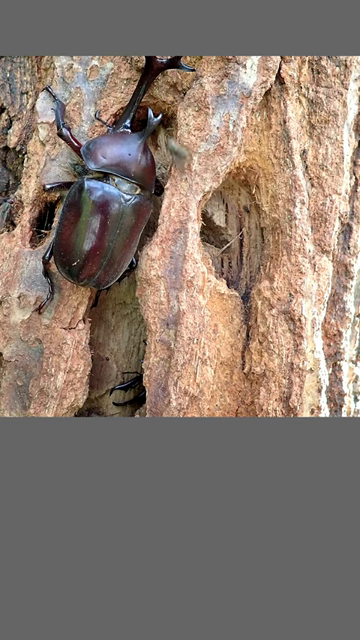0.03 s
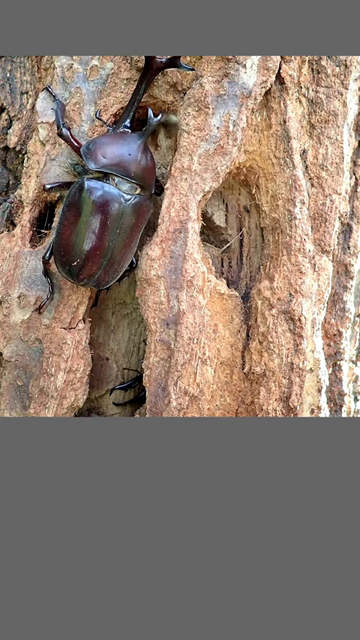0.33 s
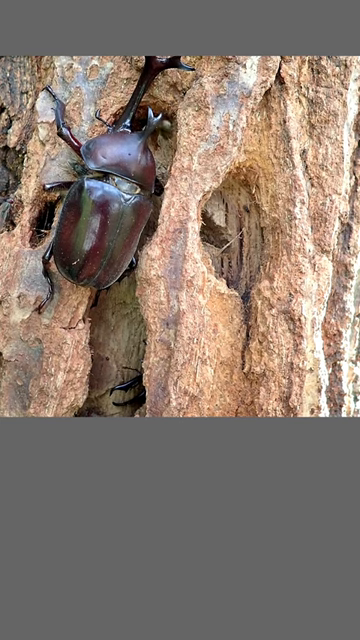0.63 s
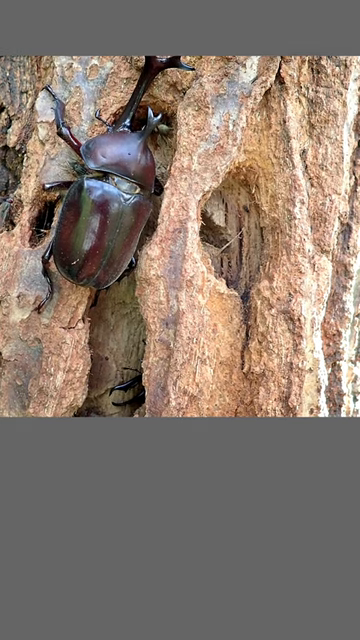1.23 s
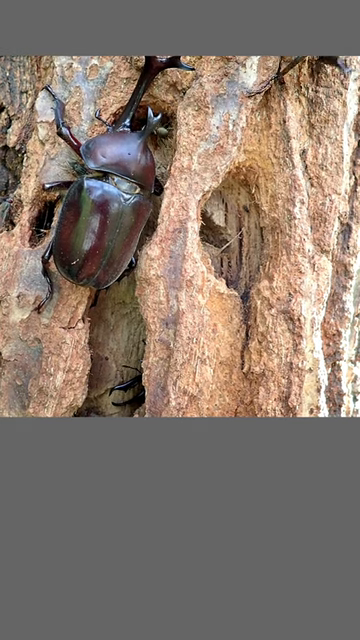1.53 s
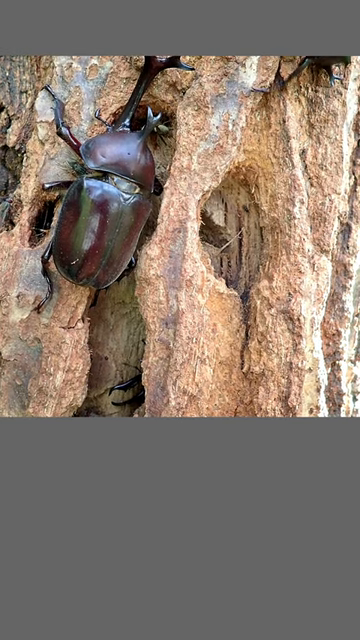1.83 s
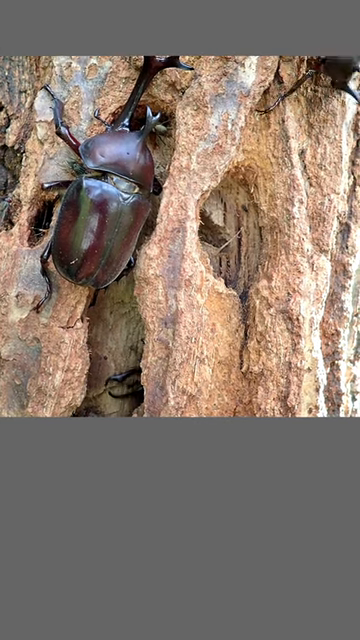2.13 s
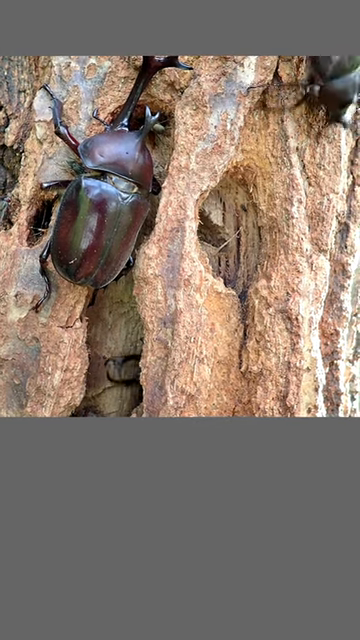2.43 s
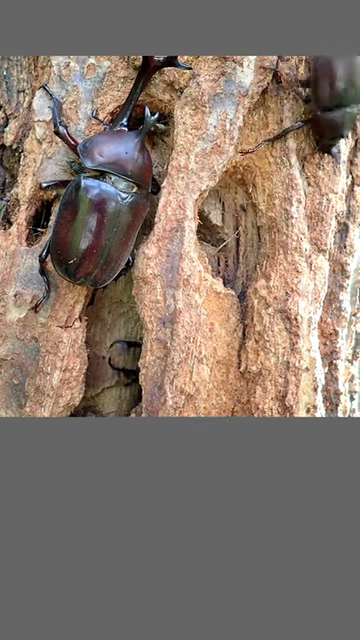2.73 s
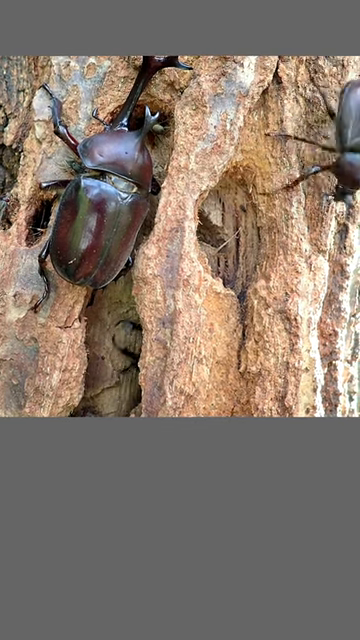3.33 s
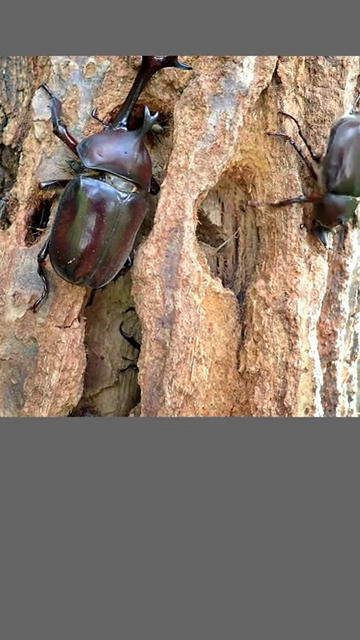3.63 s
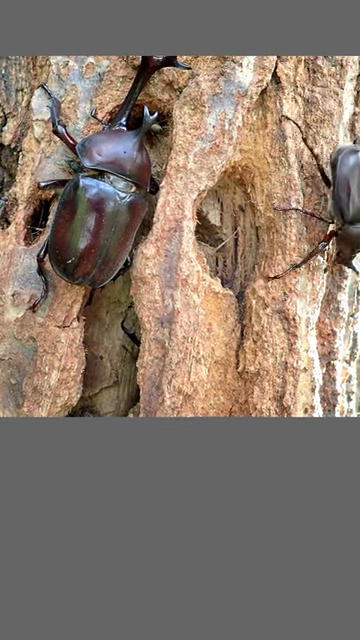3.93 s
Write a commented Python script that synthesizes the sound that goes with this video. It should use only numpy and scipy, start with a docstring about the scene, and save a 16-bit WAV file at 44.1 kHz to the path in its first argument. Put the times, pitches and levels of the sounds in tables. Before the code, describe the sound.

A nearby cicada chirps in quick buzzing phrases over a hissing chorus of distant cicadas.

```python
"""Cicadas in a summer wood. A far chorus sizzles from the start, over faint outdoor rumble and a low hum.
Almost at once a near cicada snaps its tymbals in quick chirps, each click ringing its body; its phrases
end in a brighter buzz. A few dull pops sit under the clicks, and a limiter holds the loudest peaks level.
Just past halfway a distant insect joins with a thin pulsing whistle; near the end the hum swells."""
import sys
import numpy as np
from scipy import signal
from scipy.fft import rfft, irfft, next_fast_len
from scipy.io import wavfile
from scipy.ndimage import uniform_filter1d, minimum_filter1d, map_coordinates

SR = 44100
rng = np.random.default_rng(int(sys.argv[2]) if len(sys.argv) > 2 else 0)


def persist_wave(psi):
    """Save psi, clipped to +-1, as 16-bit WAV."""
    counts = np.round(np.clip(psi, -1, 1) * 32767).astype(np.int16)
    wavfile.write(sys.argv[1], SR, np.atleast_2d(counts).T)


N = 176400

# colour of the far chorus (frequency [Hz], relative level [dB])
CHORUS_SPECTRUM = [(1500, -60), (2200, -33), (2850, -23), (3450, -29), (3900, -16.5), (4400, -5),
                   (5400, -.5), (6500, -.5), (7400, -3), (8400, -7), (9200, -21), (10000, -29),
                   (11400, -15.5), (12800, -13.5), (14400, -9), (15800, -18)]
# its stereo image (frequency [Hz], left-right likeness [-1 to 1])
CHORUS_IMAGE = [(2000, .85), (3500, .6), (5500, .45), (9000, 0), (13000, -.4)]
CHORUS_DB, CHORUS_FLUTTER_DB, TICKS_PER_S, TICKS_DB = -23, 1.0, 500, -33
# hiss of the chorus's highest voices (frequency [Hz], relative level [dB])
SIZZLE_SPECTRUM = [(6000, -40), (7200, -8), (7800, -1), (8300, 0), (8700, -4), (9200, -22), (10500, -50)]
# thin tones in that hiss (pitch [Hz], relative level [dB])
THIN_TONES = [(7776, -9), (8157, -10), (8247, -8), (8642, -14), (8748, -16), (14364, -20), (14710, -18)]
TONE_WAVER_HZ, TONE_FLUTTER_DB = 22, 3.5
# fader ride on hiss and tones together (time [s], gain [dB])
SIZZLE_FADER = [(0, -39), (.4, -37), (.85, -31), (1.3, -30), (1.7, -32), (2.3, -30), (4, -29.5)]

# colour of the outdoor rumble (frequency [Hz], relative level [dB])
RUMBLE_SPECTRUM = [(20, -19), (45, -10), (65, -3), (140, 0), (330, 1), (500, -3), (1000, -7), (1600, -10),
                   (2000, -7), (3000, -14), (6000, -30)]
# its stereo image (frequency [Hz], left-right likeness [-1 to 1])
RUMBLE_IMAGE = [(50, .25), (150, .42), (400, .58), (1000, .55), (2000, .75)]
# fader ride on the hum (time [s], gain [dB])
HUM_FADER = [(0, -67), (3.5, -66), (3.8, -56), (4, -55)]
RUMBLE_DB, HUM_HZ = -48.8, 295
# the background leans left (frequency [Hz], left minus right [dB])
BACKGROUND_PAN = [(60, 2), (200, .3), (500, 1.5), (1200, 1.8), (2400, 0), (4400, 2.5), (8000, 2),
                  (15000, 1.5)]

# the near cicada's chirps (start [s], clicks [count])
CHIRP_CUES = [(.0486, 4), (.1094, 4), (.1663, 5), (.2242, 5), (.4139, 4), (.4686, 5), (.5279, 4),
              (.5853, 5), (.6469, 4), (.7052, 4), (.7639, 4), (.8212, 4), (.8808, 4), (1.0613, 4),
              (1.1137, 5), (1.1751, 4), (1.2288, 5), (1.2907, 4), (1.348, 4), (1.4045, 5), (1.4654, 4),
              (1.5244, 4), (1.7102, 4), (1.7669, 3), (1.8224, 3), (1.8759, 4), (1.9344, 4), (1.9945, 4),
              (2.0482, 5), (2.1888, 3), (2.2442, 4), (2.3017, 3), (2.3526, 4), (2.4101, 3), (2.4624, 4),
              (2.518, 4), (2.7034, 4), (2.7599, 4), (2.8154, 4), (2.8703, 4), (2.9266, 4), (2.9837, 4),
              (3.0353, 4), (3.2191, 3), (3.2765, 3), (3.3288, 3), (3.3832, 3), (3.4328, 4), (3.491, 3),
              (3.5424, 3), (3.7256, 4), (3.7841, 3), (3.8393, 3), (3.8942, 3), (3.9475, 4)]
# spacing of the clicks in a chirp (gap [s])
CLICK_GAPS = [.004, .0035, .0038, .0042]
# buzzes that end its phrases (start [s], clicks [count])
BUZZ_CUES = [(.2798, 23), (.9302, 22), (1.5753, 22), (2.078, 15), (2.5711, 20), (3.0793, 22), (3.587, 22)]
BUZZ_LAST_GAP_S, BUZZ_SHRINK_S, JITTER_S = .0029, .000043, .00012  # a buzz speeds up click by click
# the body's low ring (base pitch [Hz], gain [dB], rise [s], fall [s], octave overtone [dB])
LOW_BODY_RING = (5860, 1.2, .00018, .00042, -22)
# its high ring in a buzz (base pitch [Hz], gain [dB], rise [s], fall [s], octave overtone [dB])
HIGH_BODY_RING = (7080, -1.8, .0003, .00065, -15)
HIGH_PEAK_CLICKS, HIGH_SPREAD_CLICKS = 4.5, 5  # the high ring peaks this far before a buzz ends
LOW_DUCK, HIGH_SAG_HZ = .52, 750  # the low ring ducks under it; the high one is flatter when weak
CLICK_SCATTER_DB, PITCH_SCATTER, PITCH_SAG_PER_S = .8, .02, .009  # pitch changes are shares of the base
# the body radiates little below 5 kHz (frequency [Hz], gain [dB])
BODY_EQ = [(3500, -16), (4500, -11), (4850, -6), (5150, 3), (5400, 1), (5720, -2), (6000, .5), (6300, 0),
           (6700, 1.5), (7200, 0)]
# colour of the bright noise on each click (frequency [Hz], relative level [dB])
CLICK_NOISE_SPECTRUM = [(200, -19), (1000, -20), (1700, -22), (2200, -11.5), (2800, -3), (3500, -11),
                        (4600, -9), (5200, 1), (6500, 3), (7200, 3), (8300, 2), (9600, -21), (11400, 7.5),
                        (12600, 10.5), (13400, 5), (16000, -6)]
CLICK_NOISE_DB, CLICK_NOISE_S = -18, .00035
# early reflections off bark, a list for each ear, left first (delay [s], gain [dB])
BARK_ECHOES = [
    [(.0014, -14), (.0019, -17)],
    [(.0008, -10), (.0013, -14)],
]
RIGHT_DB, RIGHT_LEAD_S, WOOD_T60_S, NEAR_WET_DB = -4.0, .000035, .25, -17
# soft pops under the clicks (time [s], level [dB])
POP_CUES = [(.337, -38), (.343, -37), (.532, -39), (1.632, -39), (2.112, -38), (2.625, -39)]
POP_WIDTH_S, POP_CUTOFF_HZ = .0015, 1500

# the distant insect's notes (start [s], nominal length [s], relative level [dB])
WHISTLE_NOTES = [(2.39, .05, -55), (2.49, .06, -54), (2.59, .05, -55), (2.694, 0.036, -51),
                 (2.776, 0.066, -50), (2.883, 0.06, -48), (2.981, 0.058, -45), (3.079, 0.056, -48),
                 (3.183, 0.06, -47), (3.275, 0.076, -46), (3.384, 0.05, -48), (3.476, 0.058, -49),
                 (3.582, 0.062, -50), (3.698, 0.058, -47), (3.811, 0.05, -47), (3.919, 0.048, -48)]
# its centre pitch (time [s], pitch [Hz])
WHISTLE_PITCH = [(2.4, 2055), (2.6, 2070), (2.8, 2120), (3.1, 2128), (3.45, 2112), (4, 2102)]
# its octave overtone (time [s], level over the fundamental [dB])
WHISTLE_OCTAVE = [(2.4, 10), (3.0, 8.5), (3.3, 9.5), (3.43, 15), (3.55, 14), (3.7, 11), (4, 11.5)]
WHISTLE_WAVER_HZ, WHISTLE_ARCH_HZ, OCTAVE_LAG_S = 10, 14, .018
WHISTLE_GAIN_DB, WHISTLE_WET_DB = 4.5, -10

START_S, LIMIT, LIMITER_S, HIGH_CUT_HZ = .035, .98, .0008, 15800


def amp(db):
    """Decibels to gain."""
    return 10 ** (np.asarray(db) / 20)


def unit(x):
    """Scale to rms 1."""
    return x / np.sqrt(np.mean(x ** 2) + 1e-20)


def along(points, hz):
    """Read (Hz, value) points on a log frequency axis."""
    f, v = np.transpose(points)
    return np.interp(np.log(hz + 1), np.log(f + 1), v)


def ride(points):
    """An automation curve through (time, value) points."""
    return np.interp(np.arange(N) / SR, *np.transpose(points))


def wobble(rate):
    """A smooth random curve, rate knots a second."""
    return map_coordinates(rng.standard_normal(int(N * rate / SR) + 4), [np.arange(N) * rate / SR])


def filtered(x, response):
    """Pass x through a complex frequency response."""
    size = next_fast_len(N + SR // 2)
    return irfft(rfft(x, size) * response(np.fft.rfftfreq(size, 1 / SR)), size)[..., :N]


def noise_bed(spectrum, image):
    """Coloured stereo noise of rms 1, its width set band by band."""
    def mid_side(hz):
        width = np.arccos(np.clip(along(image, hz), -1, 1)) / 2
        return amp(along(spectrum, hz)) * [np.cos(width), np.sin(width)]
    mid, side = filtered(rng.standard_normal((2, N)), mid_side)
    return unit(np.array([mid + side, mid - side]))


def rings(times, gains, pitches, rise_s, fall_s, overtone_db, size=256):
    """One short swelling and dying tone with its octave per click."""
    index = (times * SR).astype(int)[:, None] + np.arange(size) - size // 4
    t = index / SR - times[:, None]
    envelope = np.exp(-.5 * (t / np.where(t < 0, rise_s, fall_s)) ** 2)
    phase = 2 * np.pi * (pitches[:, None] * t + rng.random((len(times), 1)))
    wave = gains[:, None] * envelope * (np.sin(phase) + amp(overtone_db) * np.sin(2 * phase))
    return np.bincount(np.clip(index, 0, N).ravel(), wave.ravel(), N + 1)[:N]


def far_chorus():
    """Many far cicadas merge into a fluttering hiss from which single ticks stand out."""
    hiss = noise_bed(CHORUS_SPECTRUM, CHORUS_IMAGE)
    hiss *= amp(CHORUS_DB + CHORUS_FLUTTER_DB * wobble(300) + .4 * wobble(8))
    times = rng.uniform(0, N / SR, int(TICKS_PER_S * N / SR))
    accent, tune = rng.standard_normal((len(times), 2)).T
    pitches = 6000 + 900 * np.tanh(tune)
    ticks = rings(times, amp(3.5 * accent), pitches, rise_s=.00025, fall_s=.0004, overtone_db=-20)
    return hiss + amp(TICKS_DB) * unit(ticks)


def sizzle():
    """The highest voices of the chorus: a narrow hiss with thin, unsteady tones."""
    voices = noise_bed(SIZZLE_SPECTRUM, CHORUS_IMAGE) * amp(1.2 * wobble(60))
    for hz, db in THIN_TONES:
        pitch = hz + TONE_WAVER_HZ * (wobble(150) + .5 * wobble(2))
        phase = 2 * np.pi * np.cumsum(pitch) / SR
        gain = amp(db + TONE_FLUTTER_DB * wobble(5))
        stereo_drift = np.array([wobble(6), wobble(6)])
        voices += gain * np.sin(phase + stereo_drift)
    return amp(ride(SIZZLE_FADER)) * voices


def outdoor_rumble():
    """A low, gently breathing bed of noise."""
    return amp(RUMBLE_DB + .5 * wobble(4)) * noise_bed(RUMBLE_SPECTRUM, RUMBLE_IMAGE)


def hum():
    """A faint wavering tone that swells near the end."""
    gain = amp(ride(HUM_FADER) + 2 * wobble(12))
    pitch = HUM_HZ + 7 * wobble(30)
    return gain * np.sin(2 * np.pi * np.cumsum(pitch) / SR)


def tymbal_clicks():
    """The tymbals' rhythm: each click's time, and its brightness (the high ring's share, 0-1)."""
    times, brightness = [], []
    for start, clicks in CHIRP_CUES:
        times.append(start + np.cumsum([0, *CLICK_GAPS])[:clicks])
        brightness.append(np.zeros(len(times[-1])))
    for start, clicks in BUZZ_CUES:
        to_go = np.arange(clicks)[::-1]
        gaps = BUZZ_LAST_GAP_S + BUZZ_SHRINK_S * to_go[1:]
        times.append(start + np.append(0, np.cumsum(gaps)))
        swell = np.exp(-.5 * ((to_go - HIGH_PEAK_CLICKS) / HIGH_SPREAD_CLICKS) ** 2)
        brightness.append(swell * (to_go > 0))
    times = np.concatenate(times)
    return times + JITTER_S * rng.standard_normal(len(times)), np.concatenate(brightness)


def click_noise(times, gains):
    """A tiny burst of coloured noise sits on each click."""
    triggers = np.bincount(np.clip((times * SR).astype(int), 0, N), gains, N + 1)[:N]
    gate = signal.fftconvolve(triggers, signal.windows.gaussian(SR // 200, CLICK_NOISE_S * SR), "same")
    noise = filtered(rng.standard_normal(N), lambda hz: amp(along(CLICK_NOISE_SPECTRUM, hz)))
    return amp(CLICK_NOISE_DB) * gate * unit(noise)


def body_ring(times, gains, detune, brightness):
    """Each click rings the body; late in a buzz a higher ring takes over."""
    pitch, db, *shape = LOW_BODY_RING
    low = rings(times, gains * amp(db) * (1 - LOW_DUCK * brightness), pitch * detune, *shape)
    pitch, db, rise_s, *tail = HIGH_BODY_RING
    pitches = (pitch - HIGH_SAG_HZ * (1 - brightness)) * detune
    high = rings(times + rise_s, gains * amp(db) * brightness, pitches, rise_s, *tail)
    return filtered(low + high, lambda hz: amp(along(BODY_EQ, hz)))


def off_bark(song):
    """The direct song and its reflections off nearby bark; the right ear is softer and a touch early."""
    def ears(hz):
        delay = lambda s: np.exp(-2j * np.pi * hz * s)
        left, right = (1 + sum(amp(db) * delay(s) for s, db in echoes) for echoes in BARK_ECHOES)
        return np.array([left, amp(RIGHT_DB) * delay(-RIGHT_LEAD_S) * right])
    return filtered(song, ears)


def wood_reverb(x):
    """Diffuse echo from the trees, different in each ear."""
    t = np.arange(SR // 2) / SR
    tail = rng.standard_normal((2, len(t))) * amp(-60 * t / WOOD_T60_S)
    return signal.fftconvolve(x[None], tail / np.linalg.norm(tail[0]), axes=1)[:, :N]


def near_cicada():
    """Tymbal clicks ring the body, slowly sinking in pitch; bark and trees answer."""
    times, brightness = tymbal_clicks()
    accent, tune = rng.standard_normal((len(times), 2)).T
    gains = amp(CLICK_SCATTER_DB * accent)
    detune = 1 + PITCH_SCATTER * tune - PITCH_SAG_PER_S * times
    song = body_ring(times, gains, detune, brightness) + click_noise(times, gains)
    return off_bark(song) + amp(NEAR_WET_DB) * wood_reverb(song)


def pops():
    """Tiny dull pops of low-passed noise."""
    t = np.arange(N) / SR
    envelope = sum(amp(db) * np.exp(-.5 * ((t - s) / POP_WIDTH_S) ** 2) for s, db in POP_CUES)
    noise = filtered(rng.standard_normal((2, N)), lambda hz: 1 / (1 + (hz / POP_CUTOFF_HZ) ** 4))
    return envelope * unit(noise)


def insect_whistle():
    """A distant insect pulses ten times a second: arched notes on a thin pitch and its stronger octave."""
    t = np.arange(N) / SR
    start, length, level = np.transpose(WHISTLE_NOTES)
    middle = start + length / 2
    arch = lambda t: np.cos(np.pi / 2 * np.clip((t - middle[:, None]) / length[:, None], -1, 1)) ** 2
    notes = arch(t)
    pitch = ride(WHISTLE_PITCH) + WHISTLE_ARCH_HZ * (notes.sum(0) - .7) + WHISTLE_WAVER_HZ * wobble(120)
    phase = 2 * np.pi * np.cumsum(pitch) / SR
    gains = amp(level + WHISTLE_GAIN_DB)
    fundamental = gains @ notes ** 2.5 * np.sin(phase)
    octave = amp(ride(WHISTLE_OCTAVE)) * (gains @ arch(t - OCTAVE_LAG_S)) * np.sin(2 * phase)
    tone = fundamental + octave
    return tone + amp(WHISTLE_WET_DB) * wood_reverb(tone)


def scene():
    """The mix: the near cicada up front, the background panned slightly left behind it."""
    background = far_chorus() + sizzle() + insect_whistle() + hum() + outdoor_rumble()
    pan = lambda hz: amp(along(BACKGROUND_PAN, hz) * np.array([[.5], [-.5]]))
    return near_cicada() + pops() + filtered(background, pan)


def record(dry):
    """Master chain: an instant of silence, a fast limiter on the loudest clicks, then a steep high cut."""
    x = dry * (np.arange(N) / SR > START_S)
    window = int(LIMITER_S * SR)
    needed_gain = np.minimum(1, LIMIT / (np.abs(x).max(0) + 1e-9))
    held_gain = minimum_filter1d(needed_gain, 2 * window)
    smooth_gain = uniform_filter1d(uniform_filter1d(held_gain, window), window)
    return filtered(x * smooth_gain, lambda hz: hz < HIGH_CUT_HZ)


dry = scene()
out = record(dry)
persist_wave(out)
```